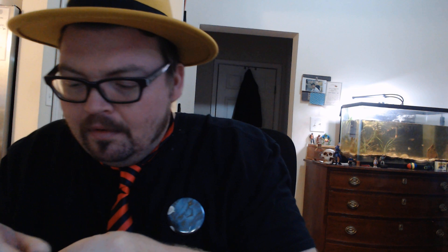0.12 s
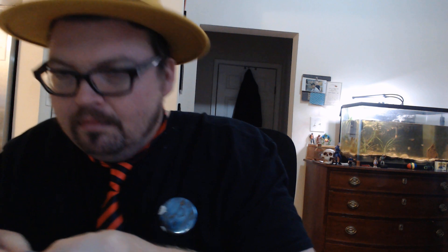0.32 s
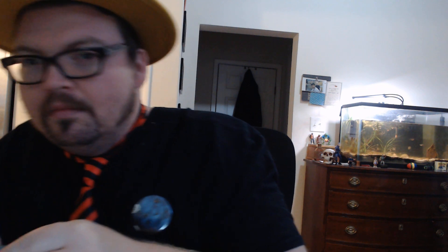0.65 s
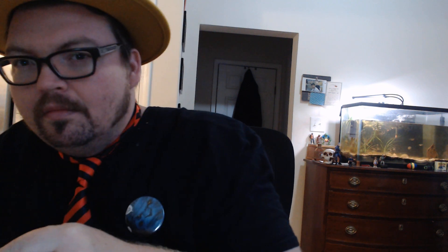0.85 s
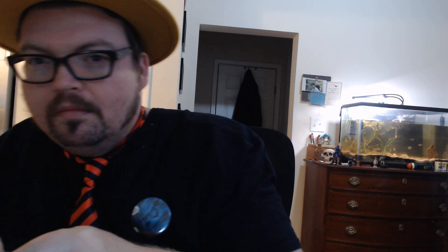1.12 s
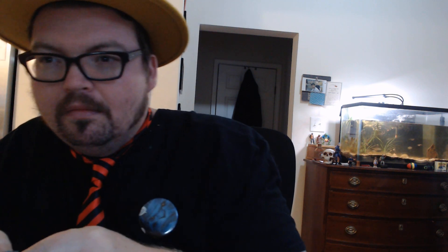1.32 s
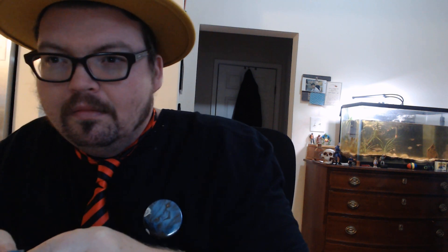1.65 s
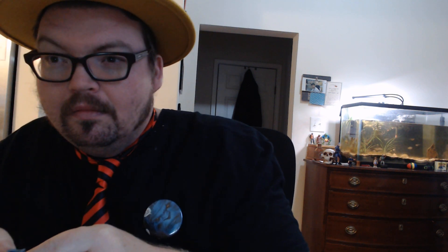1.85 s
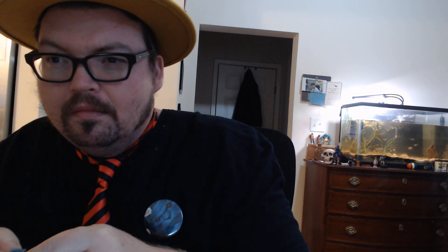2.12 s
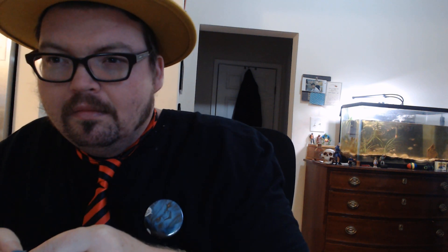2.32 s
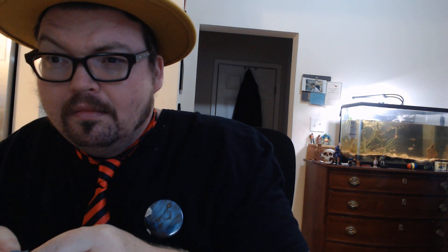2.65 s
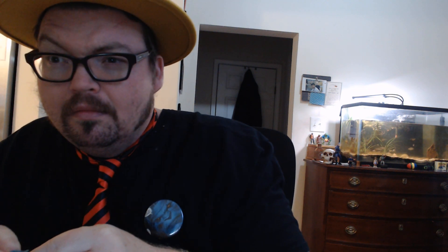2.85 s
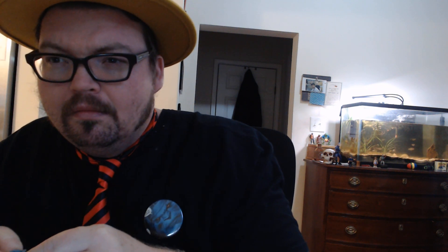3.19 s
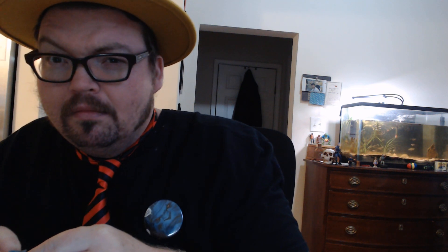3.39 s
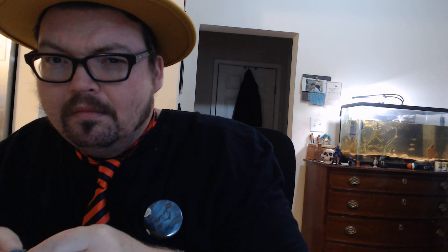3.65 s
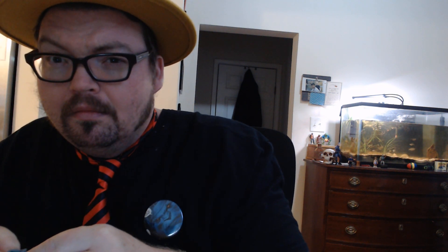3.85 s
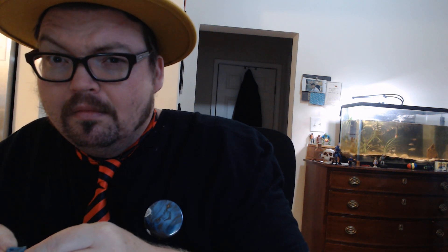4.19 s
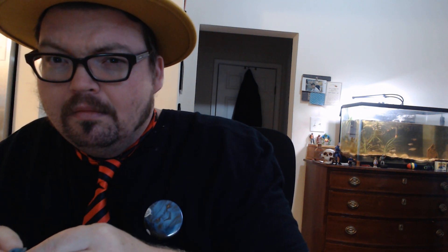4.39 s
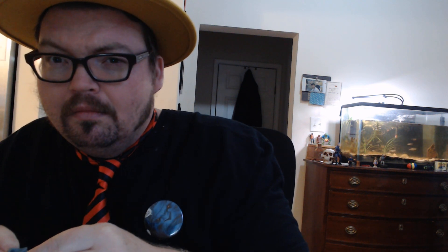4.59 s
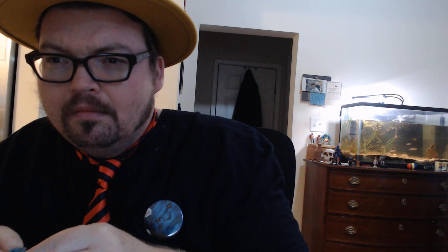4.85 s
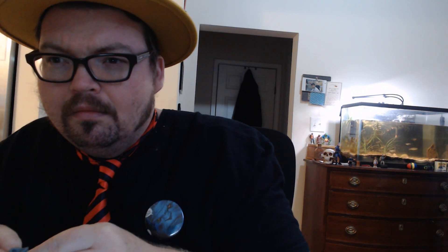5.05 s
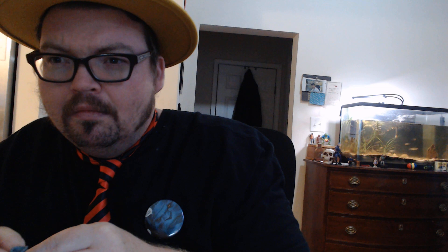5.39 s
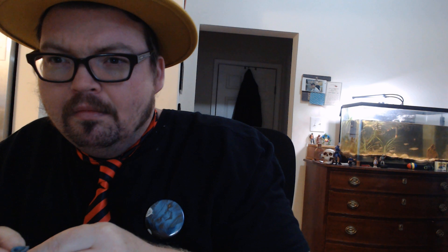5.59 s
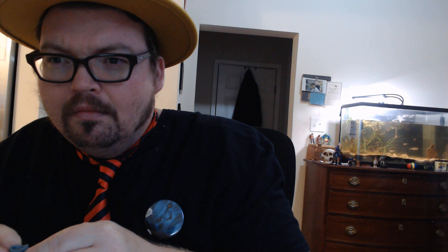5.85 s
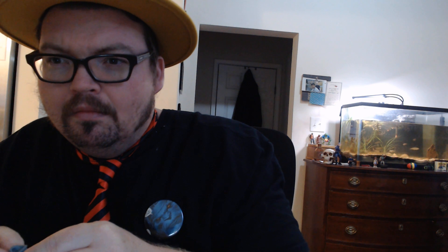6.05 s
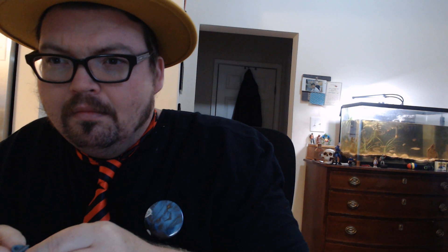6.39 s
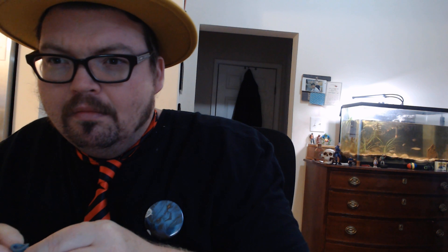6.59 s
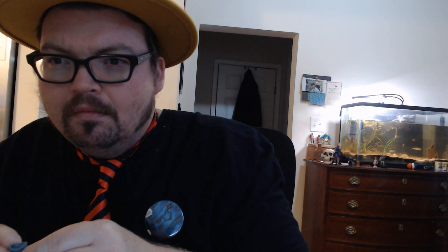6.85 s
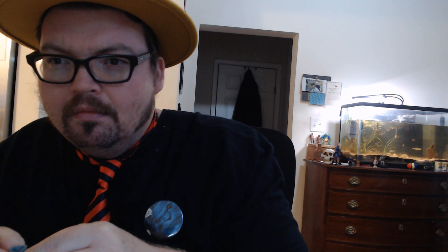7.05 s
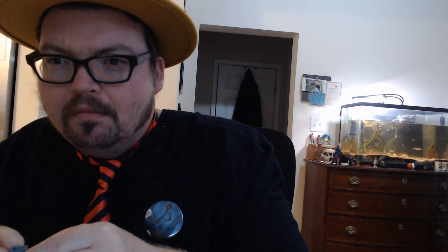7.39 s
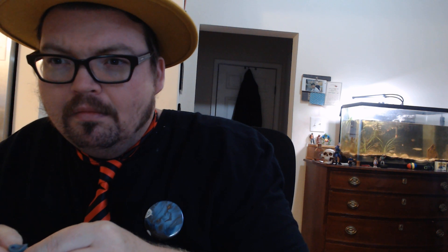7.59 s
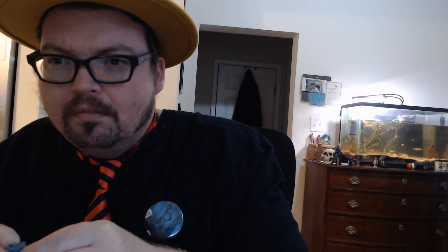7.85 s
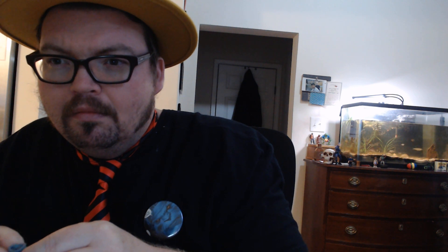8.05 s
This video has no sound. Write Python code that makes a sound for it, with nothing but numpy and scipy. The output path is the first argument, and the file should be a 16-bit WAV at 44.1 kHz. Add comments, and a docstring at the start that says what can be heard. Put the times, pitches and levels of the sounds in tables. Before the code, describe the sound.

Close indoors, fingers rub and tap a rubber balloon, then pinched air escapes in brief wavering squeals, ending with a dropping blurt and snap.

```python
"""A low room rumble (shaped noise), wavering hums and a whine pulsing fifteen times a second run beneath. At
first fingers rustle and tap on a balloon (noise in bands), with a faint breathy whistle and one brief squeal.
From 1.8 s air leaks in short squeals through the stretched neck: harmonic stacks whose pitch slides and jumps.
Rubber brushes, a puff of air, taps and two snaps (dying band noise) fall between them; near 8 s the pitch drops
and it snaps. The source is close to a small microphone in a furnished room, which adds a diffuse echo."""
import sys
import numpy as np
from scipy import signal
from scipy.io import wavfile
from scipy.ndimage import uniform_filter1d

SR = 44100
rng = np.random.default_rng(int(sys.argv[2]) if len(sys.argv) > 2 else 0)


def inscribe(sig):
    """Save sig as 16-bit PCM at rate SR to the path in sys.argv[1].

    A 1-D sig is mono; a 2-D sig holds one channel per row.
    Samples are clipped to [-1, 1] before scaling.
    """
    pcm = np.round(np.clip(np.atleast_2d(sig).T, -1, 1) * 32767)
    wavfile.write(sys.argv[1], SR, pcm.astype(np.int16))


N = 362237  # samples

# Low rumble of the room: t/s, level/dB
RUMBLE_LEVEL = [(0.0, -61), (0.3, -68), (1.65, -74.5), (1.9, -65), (3.0, -66.5), (3.6, -74.5), (4.2, -68),
                (6.7, -67), (7.5, -70), (8.21, -73)]
# Spectral density of the rumble and its thin hiss: f/Hz, relative density/dB per Hz
RUMBLE_SPECTRUM = [(40, -42.5), (70, -24), (95, -4), (130, 0), (220, -2.5), (400, -16), (1000, -12.5),
                   (1500, -29), (3000, -38), (15000, -53.5)]
# Low gliding hums, one table each: t/s, f/Hz, level/dB before the waver
HUM_TRACKS = [
    [(0.3, 106, -71), (1.7, 110, -78), (1.95, 123, -71.5), (3.1, 130, -68), (3.4, 124, -77.5),
     (3.6, 119, -72.5), (3.9, 105, -65), (4.2, 92, -71.5), (5.4, 90, -63.5), (6.2, 89, -73), (7, 88, -79.5)],
    [(4.0, 120, -84.5), (4.3, 126, -68.5), (4.9, 124, -68.5), (5.5, 120, -80.5), (6.7, 122, -74),
     (8.2, 120, -67)],
    [(6.1, 200, -87.5), (6.4, 201, -67.5), (7.0, 202, -67), (7.4, 200, -79)],
]
HUM_WAVER_HZ, HUM_WAVER = 3, 0.5
# Electronic whine: pulses, and a fainter flickering tone between them
WHINE_HZ, WHINE_DB, WHINE_START_S, WHINE_LENGTH_S = 8030, -76, 0.011, 0.0089
WHINE_PER_S = 15
WHINE_REST_HZ, WHINE_REST_DB = 8460, -89
# Reverberation time of the furnished room: f/Hz, t60/s
ROOM_DECAY = [(300, 0.035), (1500, 0.29), (5000, 0.22), (12000, 0.008)]
ROOM_DB, ROOM_DELAY_S = -11.5, 0.0014

# Faint whistle while the neck is handled: t/s, level/dB
WHISTLE_LEVEL = [(0.2, -76), (0.362, -87), (0.494, -64), (0.538, -78), (0.604, -68), (0.71, -103),
                 (0.76, -66), (0.9, -82)]
# Whistle resonance, passed twice: f/Hz, width/Hz, level/dB per pass
WHISTLE_RESONANCE = [(2070, 250, 0)]
# Fingers shifting on the rubber: peak t/s, level/dB, rise from 30 dB down/s (3 ms at least), t60/s,
# slope above 800 Hz/dB per octave, lift below 330 Hz/dB
GRIP_EVENTS = [(0.003, -26, 6, 0.017, -6.5, 6), (0.036, -32.5, 0.13, 0.2, -5, -1),
               (0.125, -51.5, 0.8, 0.23, 5, -2.5), (0.24, -49, 0.2, 0.39, -9, 0),
               (0.6, -66.5, 0.4, 0.18, -2, -9), (0.83, -62.5, 0.18, 0.68, -3.5, 6),
               (2.15, -53.5, 0.33, 0.57, 1, 3.5), (4.321, -56, 0.24, 0.53, -6, -5),
               (4.374, -50.5, -0.13, 0.19, -20.5, 10), (4.812, -51, 0.41, 0.3, -4, 3),
               (4.875, -61.5, -0.56, 0.46, -21.5, 11), (5.41, -51, 0.32, 0.28, -16, 6),
               (6.05, -62, 0.39, 0.14, 4.5, -12.5), (6.13, -51.5, 0.57, 0.27, -5.5, 0.5),
               (6.94, -49.5, 0.35, 0.5, 0, -3), (8.12, -53, 0.5, 0.29, -2, -4)]
# Spectral density of rubber friction: f/Hz, relative density/dB per Hz
RUBBER_SPECTRUM = [(88, -43), (150, -16.5), (364, -16), (459, -7), (1010, -10.5), (1200, -13.5),
                   (9270, -27.5), (15000, -52.5)]
# Resonances of the balloon between the hands: f/Hz, width/Hz, level/dB
HOLLOW_MODES = [(200, 50, 4), (462.2, 18, 7), (730, 36, -0.5), (2070, 49, 3.5)]
# Three kinds of burst, each: t/s, level/dB before a common 5.5 dB lift, centre f/Hz, t60/s
BRUSH_EVENTS = [(1.424, -79.5, 3800, 0.28), (3.309, -65, 2380, 0.5), (3.46, -70.5, 1102, 0.56),
                (3.64, -81.5, 4900, 0.3), (3.723, -69, 1853, 0.3), (3.79, -77, 2760, 0.15),
                (4.44, -75.5, 3300, 0.17), (6.243, -74, 4700, 0.35), (7.206, -68, 3790, 0.21)]  # faint brushes of narrow noise, and at 3.46 s a breath of air
TAP_EVENTS = [(0.332, -50.5, 530, 0.15), (0.734, -59.5, 800, 0.24), (0.821, -49.5, 850, 0.2),
              (0.955, -56, 754, 0.13), (1.735, -64, 489, 0.28), (2.108, -37.5, 1500, 0.041),
              (4.035, -66, 460, 0.17)]  # dull finger taps
SNAP_EVENTS = [(4.35, -53.5, 1480, 0.013), (5.331, -39, 1750, 0.039), (7.956, -7, 767, 0.0086)]  # the rubber snaps
TOUCH_S = 0.006  # soft fingers: taps and brushes swell in

# One entry per steady flutter: overtone slope/dB per octave, extra on the octave overtone/dB,
# track of (t/s, f/Hz, level/dB before roughness)
FLUTTERS = [ (-2, -3, [(0.189, 1330, -52), (0.196, 1528, -28), (0.203, 1620, -69)]),
            (1.5, 4.5, [(1.808, 1850, -46), (1.825, 1751, -28), (1.85, 1710, -22), (1.881, 1595, -25.5)]),
            (4.5, 1, [(1.883, 1164, -36.5), (1.905, 1182, -20.5), (1.946, 1089, -26), (1.995, 1073, -23.5),
            (2.04, 1063, -29.5), (2.075, 918, -34.5)]), (-3, 1, [(2.443, 1295, -52), (2.46, 1196, -29),
            (2.48, 966, -38), (2.5, 730, -44.5)]), (2.5, -0.5, [(2.53, 954, -37), (2.563, 1133, -47.5)]),
            (-2, -2.5, [(2.566, 1856, -34), (2.617, 1828, -32.5)]), (3.5, -3, [(2.62, 1336, -29.5),
            (2.665, 1347, -30.5), (2.74, 1314, -25.5), (2.86, 1324, -26.5), (2.945, 1303, -26),
            (2.988, 1235, -34.5)]), (-3.5, -7.5, [(3.39, 1886, -52.5), (3.446, 1854, -46),
            (3.472, 1872, -40.5), (3.488, 1870, -37), (3.504, 1835, -45.5), (3.526, 1871, -51.5),
            (3.548, 1842, -56), (3.575, 1860, -61)]), (7, 7, [(4.075, 1420, -62), (4.11, 1370, -62.5)]),
            (3, 2, [(4.115, 1138, -40), (4.14, 1130, -28.5), (4.2, 1116, -25.5), (4.24, 1085, -31),
            (4.258, 1006, -40.5)]), (3, 5, [(4.503, 824, -40.5), (4.538, 1038, -38)]),
            (2, -0.5, [(4.541, 1550, -29), (4.565, 1521, -28.5), (4.6, 1442, -28)]),
            (4, -6, [(4.604, 1138, -25), (4.66, 1130, -21.5), (4.7, 1119, -24), (4.722, 1104, -23.5)]),
            (2.5, 0.5, [(4.998, 853, -28), (5.016, 1015, -48), (5.03, 1061, -36)]),
            (0.5, -5.5, [(5.034, 1646, -27.5), (5.07, 1614, -28), (5.105, 1566, -36)]),
            (4.5, -1, [(5.109, 1199, -27.5), (5.2, 1164, -25), (5.253, 1098, -29.5)]),
            (-7.5, 6.5, [(5.645, 1087, -39.5), (5.668, 1033, -61)]), (5, 8, [(5.674, 945, -51),
            (5.682, 947, -29)]), (4, -1.5, [(5.684, 1486, -24.5), (5.695, 1494, -18.5), (5.72, 1460, -21),
            (5.78, 1480, -22.5), (5.82, 1433, -26), (5.862, 1396, -22.5)]), (6, -2, [(5.866, 1121, -23.5),
            (5.89, 1117, -21), (5.94, 1093, -21.5), (5.975, 1057, -26.5)]), (3, 16, [(5.977, 704, -34),
            (5.995, 712, -36)]), (4, 17, [(6.012, 707, -39), (6.019, 687, -27), (6.027, 664, -21),
            (6.031, 730, -27.5)]), (-0.5, 2, [(6.033, 743, -31.5), (6.045, 685, -32), (6.058, 565, -31)]),
            (0, 14.5, [(6.06, 501, -27), (6.068, 531.5, -41), (6.077, 588, -24), (6.081, 606, -47)]),
            (4.5, 4.5, [(6.502, 1070, -59), (6.522, 1028, -44)]), (2, 0.5, [(6.528, 1634, -30.5),
            (6.537, 1650, -25), (6.6, 1651, -25), (6.66, 1564, -27.5), (6.732, 1484, -24.5)]),
            (5.5, -4, [(6.74, 1155, -27.5), (6.8, 1122, -23.5), (6.856, 1084, -27.5), (6.885, 1005, -39)]),
            (0.5, 7.5, [(6.93, 630, -35.5), (6.942, 704, -26.5), (6.95, 605, -22.5), (6.958, 695, -19.5),
            (6.966, 724, -46)]), (-10.5, -9, [(7.044, 1210, -42.5), (7.05, 1204, -27), (7.056, 1290, -43)]),
            (-7, 1, [(7.428, 1940, -55), (7.448, 1952, -43.5), (7.5, 1878, -42), (7.618, 1752, -40),
            (7.712, 1679, -33), (7.8, 1606, -34.5)]), (5.5, 2, [(7.803, 1235, -29.5), (7.85, 1171, -25.5),
            (7.881, 1138, -28.5), (7.915, 1003, -24.5)]), (5, 3.5, [(7.918, 900, -24), (7.932, 745, -23),
            (7.95, 718.5, -15.5)]), (0.5, -2.5, [(7.952, 723, -15.5), (7.97, 671, -12.5),
            (7.993, 561.5, -17)]), (2, -1.5, [(7.995, 484, -17), (8.003, 452, -11)]),
            (0.5, 9, [(8.012, 880, -20), (8.017, 922, -8.5), (8.028, 978, -16.5), (8.036, 990, -23)]), ]
# Colour of neck, hands and microphone: f/Hz, relative level/dB
NECK_COLOUR = [(450, 4.5), (700, 5), (1100, 7.5), (1600, -1.5), (2300, -1), (3200, -3.5), (4300, -3),
               (5500, -13), (7000, -21.5), (9000, -22), (12000, -36), (15000, -53)]
# A second, slower flap of the lips riding on a squeal, one table each: t/s, f/Hz, depth
FLAP_TRACKS = [
    [(1.808, 895, .12), (1.84, 870, 0)],
    [(1.91, 110, 0), (1.945, 177, .9), (2.04, 180, .9), (2.07, 180, 0)],
    [(2.564, 925, .3), (2.62, 925, .3)],
    [(4.115, 155, .35), (4.165, 104, .3), (4.2, 97, .27), (4.258, 104, .35)],
]
# Stretches of uneven flutter: start t/s, end t/s, roughness 0-1
ROUGH_SPANS = [(.185, .21, .6), (1.881, 1.9, .68), (1.9, 2.05, .55), (2.05, 2.08, .8), (2.47, 2.6, .6),
               (4.11, 4.26, .43), (5.075, 5.115, .55), (5.21, 5.255, .52), (5.672, 5.69, .75),
               (5.976, 5.997, .6), (6.012, 6.085, .36), (6.5, 6.536, .65), (6.93, 6.97, .65),
               (7.916, 7.955, .62), (7.955, 7.99, .46), (7.99, 8.013, .6), (8.013, 8.04, .3)]
# Breathy jet under each squeal, passed twice: f/Hz, width/Hz, level/dB per pass
JET_MODES = [(900, 1300, -10.5), (4460, 7400, -25.5)]
CLEAR_ROUGHNESS, BEAT_HZ = .05, 260
RAGGED_S, RAGGED_ROUGHNESS = .008, .58  # every flutter ends ragged, and starts ragged after a jump
ONSET_S = .008  # every flutter builds up
OVERLAP_S, LEAD_S = .009, .007  # at a jump the old flutter lingers and the new one fades in early
COUPLING_DB = 6  # strength of the sum tones while two flutters share the jet
OVERTONE_WAVER_DB, OVERTONE_WAVER_S = 2.5, .04  # upper overtones swell and fade on their own
FLAP_LAG = 1.7  # spread of the flap's timing from overtone to overtone, radians
SLACK_HZ, SLACK_RING_HZ, SLACK_RING_DB = 800, 5120, 3.5  # below SLACK_HZ the slack neck rings in the treble
CUTOFF_HZ = 15250


def amp(db):
    """Decibel law: level to amplitude ratio."""
    return 10 ** (np.asarray(db) / 20)


def rms_one(x):
    """Normalization by mean power, to rms 1."""
    return x / np.sqrt(np.mean(np.abs(x) ** 2) + 1e-20)


def in_time(rows):
    """Linear interpolation: the sample slice a table covers and its columns, sample by sample."""
    s, *columns = np.transpose(rows)
    span = slice(int(s[0] * SR), min(int(s[-1] * SR), N))
    t = np.arange(span.start, span.stop) / SR
    return span, [np.interp(t, s, c) for c in columns]


def at_hz(points, hz):
    """Interpolation of an (f/Hz, value) table on a logarithmic frequency axis."""
    table = np.array(points)
    return np.interp(np.log(hz), np.log(table[:, 0]), table[:, 1])


def soft_ends(length, fade_s):
    """Windowing: a linear fade at both ends."""
    edge = np.minimum(np.arange(length), np.arange(length)[::-1])
    return np.clip(edge / (fade_s * SR), 0, 1)


def highpass(x, order, hz):
    """Butterworth attenuation of the bass."""
    return signal.sosfilt(signal.butter(order, hz, "high", fs=SR, output="sos"), x)


def bandpass(x, low_hz, high_hz):
    """Butterworth selection of one band."""
    return signal.sosfilt(signal.butter(2, [low_hz, high_hz], "band", fs=SR, output="sos"), x)


def wander(hz):
    """Random fluctuation: noise low-passed at hz, rms 1."""
    return rms_one(signal.sosfilt(signal.butter(2, hz, fs=SR, output="sos"), rng.standard_normal(N)))


def bands():
    """Half-octave analysis of noise, as (centre Hz, noise); neighbouring bands are unrelated."""
    edges = 40 * 2 ** np.arange(0, 9, .5)
    white = rng.standard_normal((2, N))
    return [(np.sqrt(lo * hi), bandpass(white[k % 2], lo, hi))
            for k, (lo, hi) in enumerate(zip(edges, edges[1:]))]


def resonate(x, modes):
    """Parallel two-pole resonances, damped according to bandwidth."""
    out = 0
    for hz, width, level_db in modes:
        r = np.exp(-np.pi * width / SR)
        zeros = [(1 - r * r) / 2, 0, (r * r - 1) / 2]
        poles = [1, -2 * r * np.cos(2 * np.pi * hz / SR), r * r]
        out = out + amp(level_db) * signal.lfilter(zeros, poles, x)
    return out


def rumble():
    """Broadband noise with the spectral density of a room: low rumble and a thin tail of hiss."""
    _, (level_db,) = in_time(RUMBLE_LEVEL)
    noise = rms_one(sum(amp(at_hz(RUMBLE_SPECTRUM, hz)) * band for hz, band in bands()))
    return noise * amp(np.pad(level_db, (0, N - len(level_db)), "edge"))


def hums():
    """Gliding sinusoids under random modulation of amplitude and phase."""
    out = np.zeros(N)
    for rows in HUM_TRACKS:
        span, (hz, level_db) = in_time(rows)
        waver = 1 + HUM_WAVER * (wander(HUM_WAVER_HZ) + 1j * wander(HUM_WAVER_HZ))[span]
        tone = np.real(waver * np.exp(2j * np.pi * np.cumsum(hz) / SR))
        out[span] += amp(level_db) * soft_ends(len(hz), 0.057) * tone
    return out


def whine():
    """Periodic gating of a high sinusoid, with a fainter flickering one in the gaps."""
    t = np.arange(N) / SR
    gate = (t - WHINE_START_S) % (1 / WHINE_PER_S) < WHINE_LENGTH_S
    on = uniform_filter1d(1. * gate, size=60)
    pulses = amp(WHINE_DB) * on * np.sin(2 * np.pi * WHINE_HZ * t)
    flicker = (1 - on) * np.abs(wander(12))
    return pulses + amp(WHINE_REST_DB) * flicker * np.sin(2 * np.pi * WHINE_REST_HZ * t)


def room(x):
    """Diffuse reverberation: convolution with noise that decays exponentially band by band."""
    t = np.arange(SR // 2) / SR
    # each band is read from 1 s on, past the filter's start
    tail = sum(band[SR:SR + len(t)] * amp(-60 * t / at_hz(ROOM_DECAY, hz)) for hz, band in bands())
    tail = tail * np.clip(t / ROOM_DELAY_S - 1, 0, 1)
    return amp(ROOM_DB) * signal.fftconvolve(x, tail / np.sqrt(np.sum(tail ** 2)))[:N]


def whistle():
    """Resonance excited by noise: two passes through one narrow mode."""
    out = np.zeros(N)
    span, (level_db,) = in_time(WHISTLE_LEVEL)
    breath = rng.standard_normal(len(level_db))
    out[span] = amp(level_db) * rms_one(resonate(resonate(breath, WHISTLE_RESONANCE), WHISTLE_RESONANCE))
    return out


def rustle():
    """Friction noise, patchy and grainy: each grip swells, dies away and has its own spectral slope."""
    out, t = np.zeros(N), np.arange(N) / SR
    noise, grain = bands(), amp(1.8 * wander(45))
    scale = np.std(sum(amp(at_hz(RUBBER_SPECTRUM, hz)) * band for hz, band in noise if 260 < hz < 800))
    noise = [(hz, band * grain * amp(at_hz(RUBBER_SPECTRUM, hz) + 2.2 * wander(46)) / scale)
             for hz, band in noise]
    for s, peak_db, rise, t60, slope_db, bass_db in GRIP_EVENTS:
        rise = max(rise, .003)
        span = slice(max(int((s - 2 * rise) * SR), 0), int((s + t60) * SR))
        since = t[span] - s
        swell_db = peak_db + np.where(since < 0, 30 * since / rise, -60 * since / t60)
        coloured = sum(band[span] * amp(slope_db * np.log2(max(hz / 800, 1)) + bass_db * (hz < 330))
                       for hz, band in noise)
        out[span] += amp(swell_db) * coloured
    return out


def bursts(events, q, attack_s):
    """Damped impact: dying noise, band-passed around a centre with a width set by 1 / q."""
    out, t = np.zeros(N), np.arange(SR // 2) / SR
    for s, level_db, hz, t60 in events:
        noise = rms_one(bandpass(rng.standard_normal(len(t)), hz / (1 + 1 / q), hz * (1 + 1 / q)))
        decay = amp(level_db + 5.5 - 60 * t / max(t60, .003))
        attack = np.minimum(t / attack_s, 1)
        at = int(s * SR)
        out[at:at + len(t)] += (decay * attack * noise)[:N - at]
    return out


def roughness():
    """Irregular self-oscillation: roughness of the flutter through time."""
    rough, last_end = np.full(N, CLEAR_ROUGHNESS), -np.inf
    for *_, rows in FLUTTERS:
        start, end = rows[0][0], rows[-1][0]
        rough[int((end - RAGGED_S) * SR):int(end * SR)] = RAGGED_ROUGHNESS
        if start - last_end < OVERLAP_S:
            rough[int(last_end * SR):int((start + RAGGED_S) * SR)] = RAGGED_ROUGHNESS
        last_end = end
    for start, end, value in ROUGH_SPANS:
        rough[int(start * SR):int(end * SR)] = value
    return uniform_filter1d(rough, size=200)


def slow_flap():
    """Modulation by a second lip motion, as a complex oscillation."""
    flap = np.zeros(N, complex)
    for rows in FLAP_TRACKS:
        span, (hz, depth) = in_time(rows)
        flap[span] = depth * np.exp(2j * np.pi * np.cumsum(hz) / SR)
    return flap


def harmonic_stack(hz, slope_db, octave_db, jitter, flap):
    """Fourier synthesis of the periodic puffs of air, with side lines from the flap."""
    phase = 2 * np.pi * np.cumsum(hz) / SR + jitter
    k = np.arange(1, int(15500 / hz.max()) + 1)[:, None]  # harmonic numbers
    ring_db = SLACK_RING_DB * (hz.mean() < SLACK_HZ) * np.exp(-(4 * np.log2(k * hz / SLACK_RING_HZ)) ** 2)
    gains = amp(at_hz(NECK_COLOUR, k * hz) + slope_db * np.log2(k) + octave_db * (k == 2) + ring_db)
    gains = gains / np.sqrt(np.sum(gains ** 2, axis=0) / 2)
    lags = rng.normal(0, .65, size=48)[k]  # overtones loosely in step: a puff of air per cycle
    knots = rng.standard_normal((48, 12))
    step = np.arange(len(hz)) / (OVERTONE_WAVER_S * SR)
    waver = [np.interp(step, np.arange(12), knots[j]) for j in k[:, 0]]
    gains = gains * amp(OVERTONE_WAVER_DB * (k > 2) * waver)
    sides = flap * np.exp(1j * rng.normal(0, FLAP_LAG, size=48)[k])
    side_lines = 1 + sides + .25 * sides ** 2 + .25 * sides ** 3  # above every overtone
    return np.sum(gains * side_lines * np.exp(1j * (k * phase + lags)), axis=0)


def jet_noise(squeal):
    """Turbulence: resonant breath that follows the squeal's rms level, in gusts."""
    flow = np.sqrt(np.abs(uniform_filter1d(squeal ** 2, size=800)))
    gusts = amp(3 * wander(10))
    return gusts * flow * resonate(resonate(rng.standard_normal(N), JET_MODES), JET_MODES)


def squeals():
    """Self-oscillation of rubber lips: harmonic flutters, roughened in time and width, coupled at jumps."""
    lanes = np.zeros((2, N), complex)  # alternate flutters, so that neighbours may overlap
    unsteady = roughness() ** 2
    jitter = .28 * unsteady * wander(300)
    shimmer = 1 + .4 * unsteady * (wander(400) + 1j * wander(400))
    beat = 2 * np.pi * np.cumsum(BEAT_HZ * (1 + .2 * wander(25))) / SR
    shimmer += .5 * unsteady * np.cos(beat)  # the two lips drift out of step
    flap = slow_flap()
    jitter += .2 * flap.imag  # the flap also sways the timing: more side lines higher up
    starts = [rows[0][0] for *_, rows in FLUTTERS[1:]] + [np.inf]
    for i, ((slope_db, octave_db, rows), next_start) in enumerate(zip(FLUTTERS, starts)):
        first, last = rows[0], rows[-1]
        jumped = 0 < first[0] - FLUTTERS[i - 1][2][-1][0] < OVERLAP_S
        lead = LEAD_S if jumped else 0
        linger = OVERLAP_S if next_start - last[0] < OVERLAP_S else OVERLAP_S / 4
        span, (hz, level_db) = in_time([(first[0] - lead, *first[1:]), *rows, (last[0] + linger, *last[1:])])
        stack = harmonic_stack(hz, slope_db, octave_db, jitter[span], flap[span])
        stack *= np.minimum(np.arange(len(hz)) / (ONSET_S * SR), 1)
        lanes[i % 2, span] = amp(level_db) * soft_ends(len(hz), .005) * stack * shimmer[span]
    sum_tones = amp(COUPLING_DB) * lanes[0] * lanes[1]
    out = np.real(lanes[0] + lanes[1] + sum_tones)
    out += jet_noise(out)
    return highpass(out, 6, 400)  # the small neck radiates no bass


def scene():
    """Superposition of background, direct sound, its echo and the hollow's resonance."""
    background = rumble() + hums() + whine()
    hands = rustle()
    lumps = amp(3 * wander(18))  # the hollow answers in uneven gusts
    handling = whistle() + hands + resonate(lumps * hands, HOLLOW_MODES)
    brushes = bursts(BRUSH_EVENTS, q=9.0, attack_s=TOUCH_S)
    taps = bursts(TAP_EVENTS, q=4.3, attack_s=TOUCH_S)
    snaps = bursts(SNAP_EVENTS, q=1.0, attack_s=0.00048)
    near = brushes + taps + snaps + squeals()
    return (background + handling + near + room(near))[None]


def record(dry):
    """Saturation and band limits of a small capsule: peaks rounded, deep bass lost, top cut."""
    thin = highpass(np.tanh(dry), 4, 72)
    return signal.sosfilt(signal.cheby2(14, 70, CUTOFF_HZ + 150, fs=SR, output="sos"), thin)


dry = scene()
out = record(dry)
inscribe(out)
```